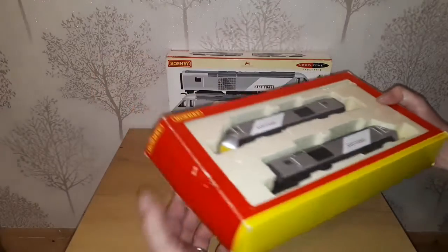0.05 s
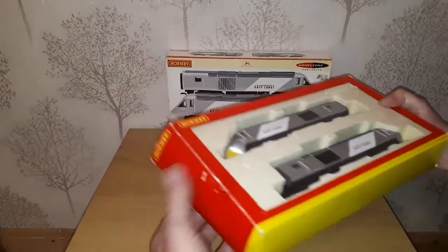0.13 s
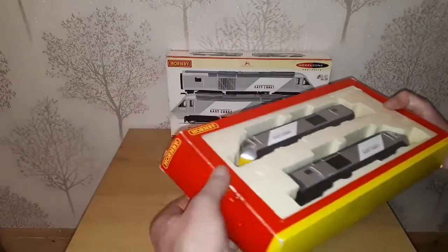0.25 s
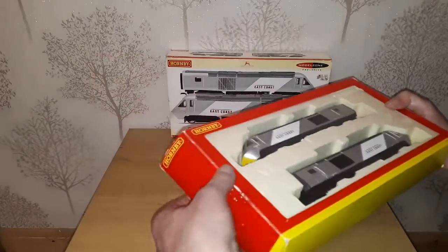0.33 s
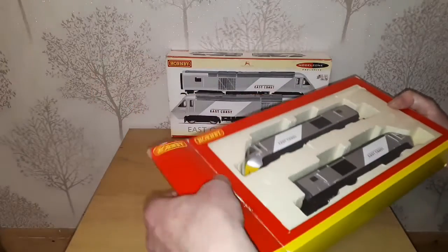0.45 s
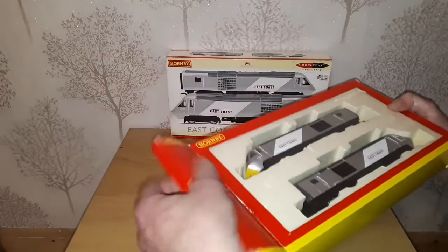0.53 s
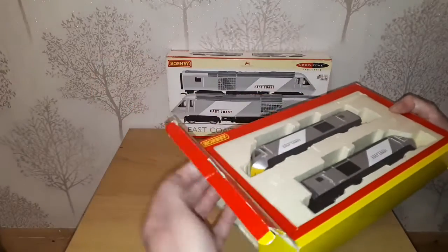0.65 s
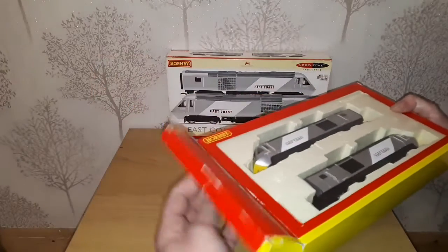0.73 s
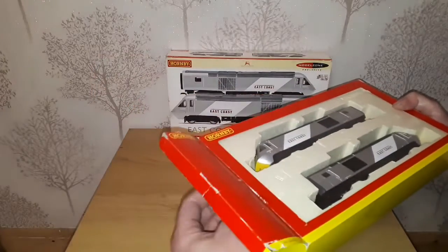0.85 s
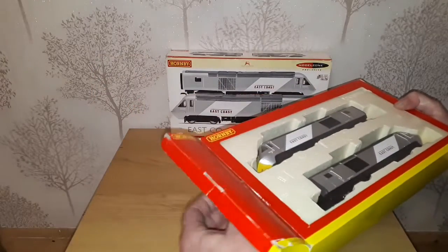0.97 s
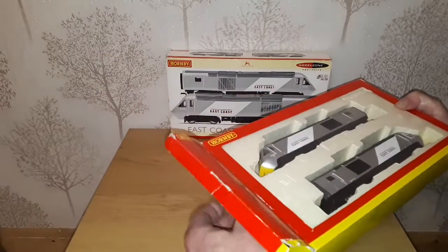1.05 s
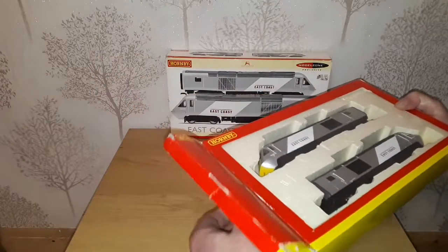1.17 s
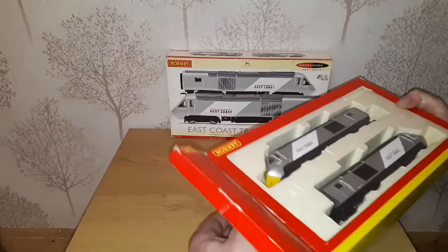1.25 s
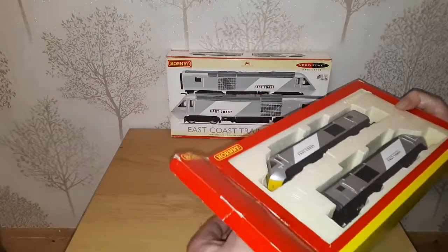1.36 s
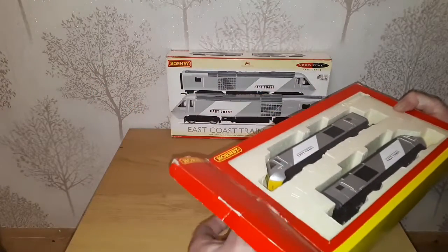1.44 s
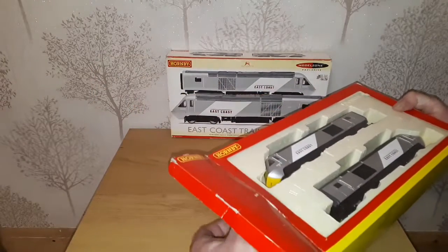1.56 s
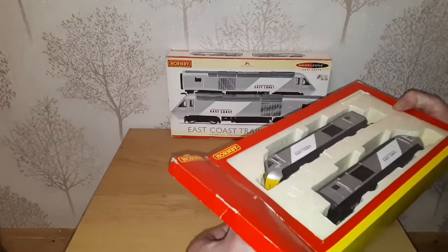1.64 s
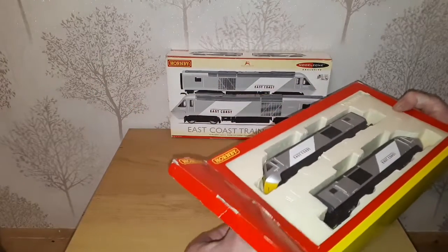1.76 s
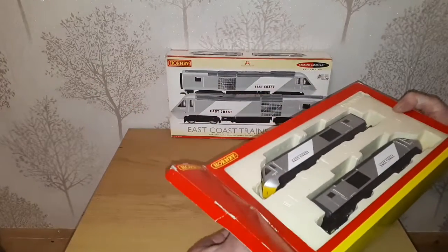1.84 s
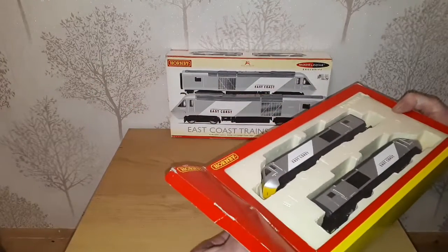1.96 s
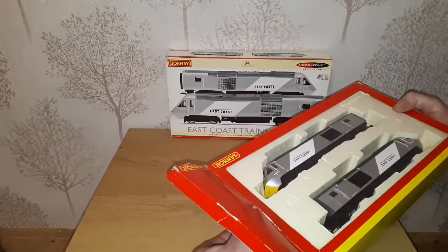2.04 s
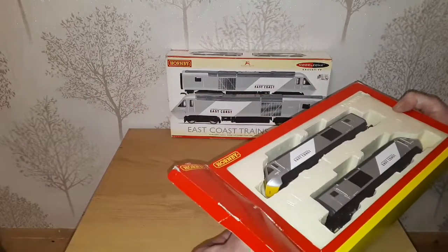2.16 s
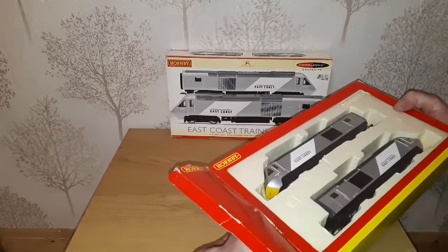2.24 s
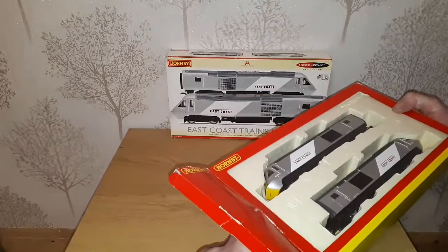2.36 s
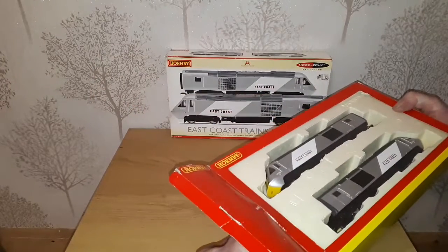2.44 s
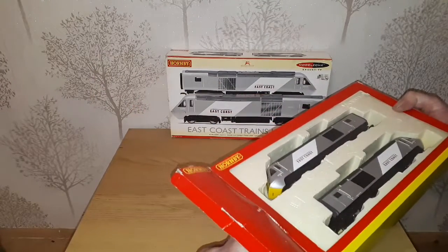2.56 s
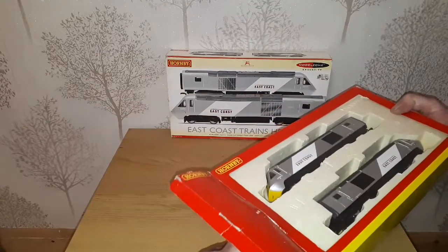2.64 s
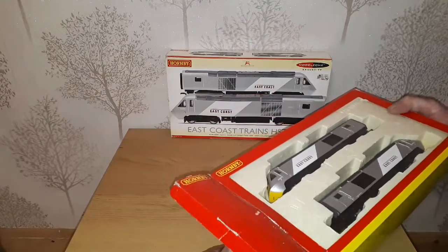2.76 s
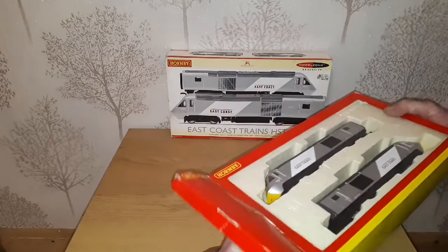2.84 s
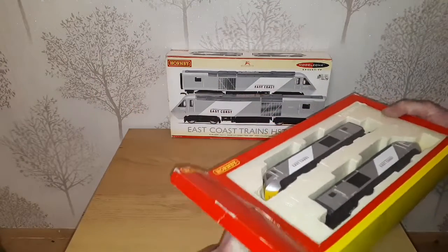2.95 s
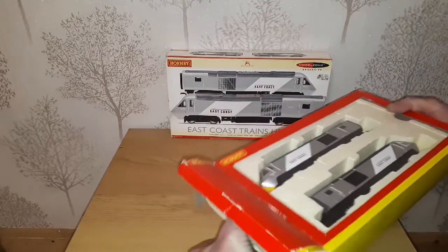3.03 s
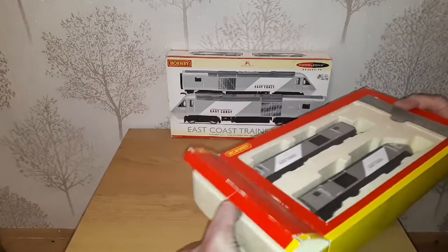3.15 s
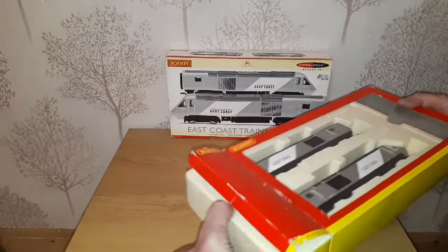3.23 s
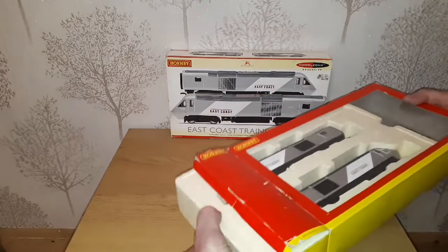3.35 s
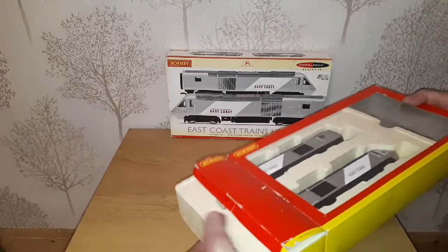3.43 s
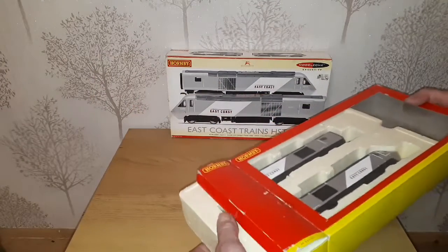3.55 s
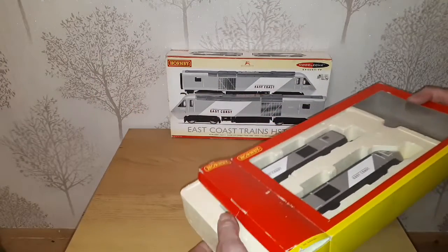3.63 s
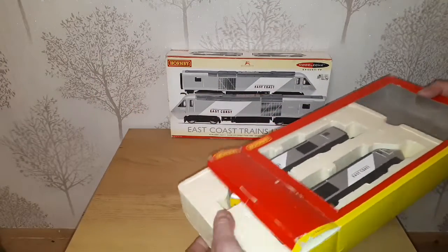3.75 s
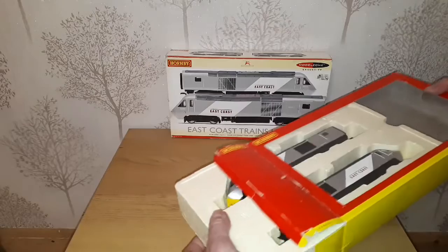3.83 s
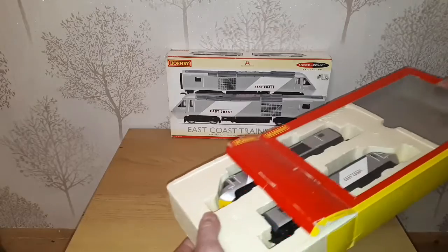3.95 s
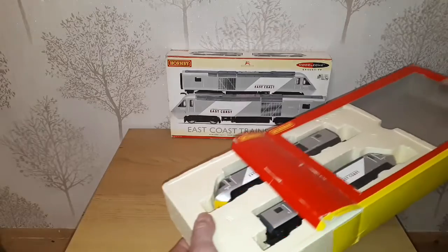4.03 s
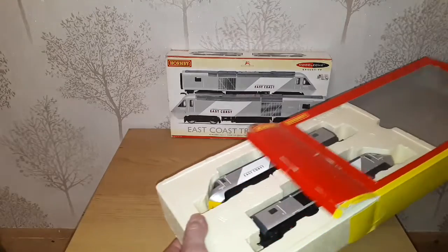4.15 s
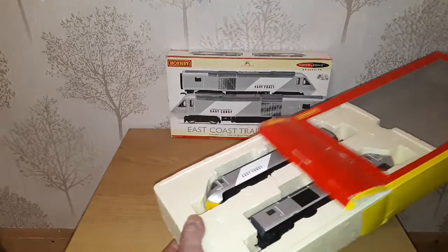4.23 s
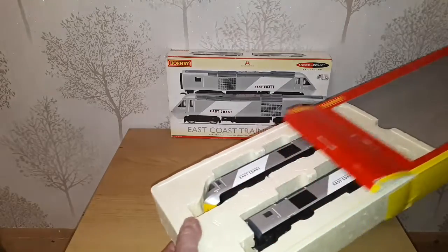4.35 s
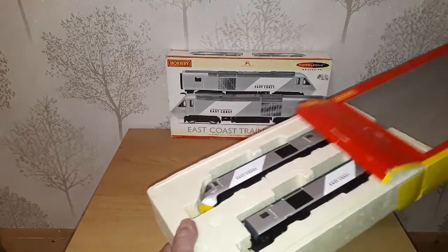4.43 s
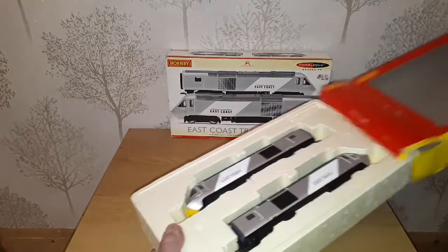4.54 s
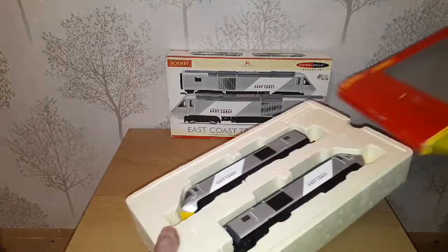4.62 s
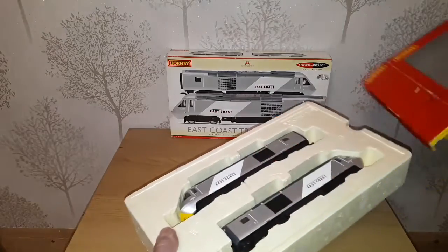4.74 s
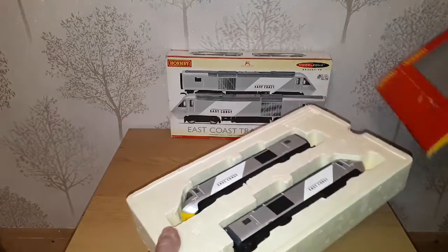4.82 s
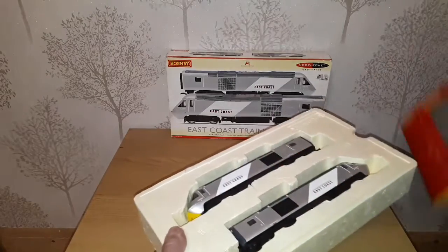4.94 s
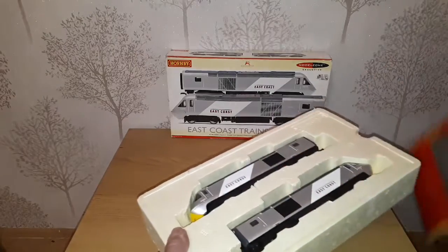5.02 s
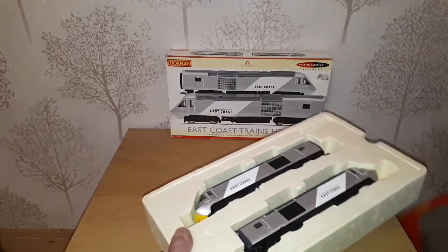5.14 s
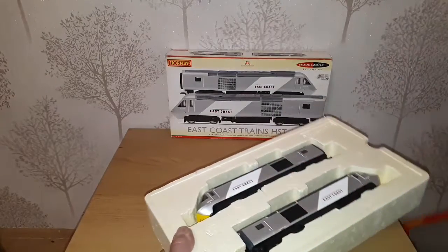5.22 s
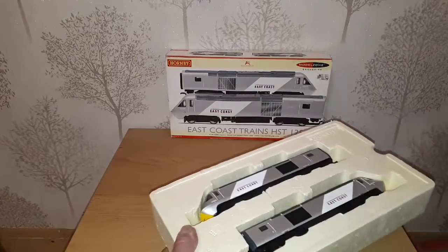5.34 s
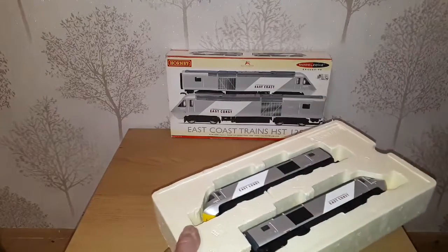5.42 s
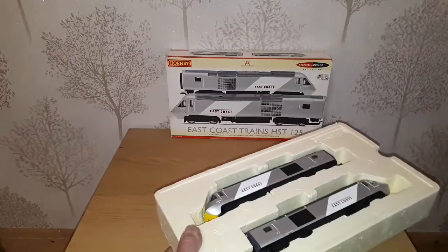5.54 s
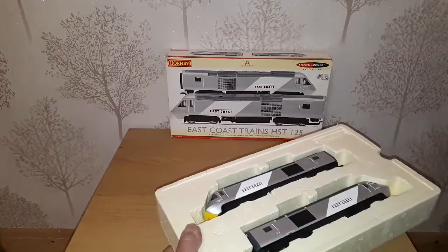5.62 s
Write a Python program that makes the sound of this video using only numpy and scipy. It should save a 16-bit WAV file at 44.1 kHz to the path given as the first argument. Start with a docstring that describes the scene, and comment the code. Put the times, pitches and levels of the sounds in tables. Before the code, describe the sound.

Fingers tap and rub a thin card box, then a foam tray hisses out in two strokes and the empty sleeve drops with a dull knock.

```python
"""In a quiet room, over a table, a thin card box is turned in two hands; fingers tap, grip and rub it.
A foam tray is pulled out in two strokes: the foam hisses on the card and the emptying sleeve hums hollow.
The sleeve slips free and is dropped aside with a dull knock.
Blows and friction noise excite the resonances of panels, sleeve, flap and edges; the room answers faintly."""
import sys
import numpy as np
from scipy import signal
from scipy.fft import rfft, irfft, next_fast_len
from scipy.io import wavfile
from scipy.ndimage import uniform_filter1d, map_coordinates

SR = 44100
rng = np.random.default_rng(int(sys.argv[2]) if len(sys.argv) > 2 else 0)


def int16_out(signal):
    """Quantize to a 16-bit WAV file."""
    q = np.round(np.clip(np.atleast_2d(signal).T, -1, 1) * 32767)
    wavfile.write(sys.argv[1], SR, q.astype(np.int16))


N = 250752  # samples

# resonances of the large panels, the sleeve, the flap and the card edges:
# (centre [Hz], width [Hz], relative level [dB])
PANEL_MODES = [(71, 14, -21.5), (97, 97, -6), (164.3, 43, 3.5), (231.6, 41, -2)]
SLEEVE_MODES = [(296.6, 65, -3.5), (393.4, 34, 0), (458, 78, -3.5), (577, 45.5, -1), (710, 108, -3.5),
                (873, 85, 0), (972, 135, -5.5)]
FLAP_MODES = [(1106, 150, 4.5), (1375, 185, 4.3), (1576, 243, 4.3), (1837, 110, 7.1), (2116, 310, 0.98)]
EDGE_MODES = [(2393, 340, -3.1), (2930, 500, -0.27), (3230, 520, 0.53), (3810, 580, -5)]
# smooth spectra of surface hiss and fine sizzle: (frequency [Hz], relative level [dB])
SURFACE_SPECTRUM = [(2410, -49), (4100, -8.5), (5910, -8.5), (7360, -15), (8000, -33.5), (10400, -46),
                    (17600, -120)]
SIZZLE_SPECTRUM = [(4710, -11), (8000, -9), (8660, -13), (10600, -8.5), (13800, -10.5), (15900, -14)]
# the sleeve laid to the right: (from time [s], delay of the left channel [s])
ASIDE_FROM, LEFT_DELAY = (5.2, .0003)
BOX_PAN_DB = -3.8  # left relative to right, for the body of the box


def amp(db):
    """Decibel law: amplitude gain of a level in dB."""
    return 10 ** (np.asarray(db) / 20)


def unit(x):
    """Power normalisation: scale a signal to rms 1."""
    return x / np.sqrt(np.mean(x ** 2) + 1e-20)


def along(points, hz):
    """Logarithmic frequency scale: interpolate (Hz, value) points along it."""
    f, v = np.transpose(points)
    return np.interp(np.log(hz + 1), np.log(f + 1), v)


def filtered(x, response):
    """Linear filtering: multiply the spectrum of x by a complex response of frequency."""
    m = next_fast_len(x.shape[-1] + 4096)  # padding keeps tails from wrapping round
    spectrum = rfft(x, m) * response(np.fft.rfftfreq(m, 1 / SR))
    return irfft(spectrum, m)[..., :x.shape[-1]]


def modes(table):
    """Modal superposition: causal response of damped resonators with alternating sign."""
    def response(f):
        total = 0
        for k, (centre, width, db) in enumerate(table):
            resonance = 1j * f * width / (centre * centre - f * f + 1j * f * width)
            total = total + (-1) ** k * amp(db) * resonance
        return total
    return response


def steep(table):
    """Modal magnitude raised to a power: resonances with dark skirts, for steady rubbing."""
    return lambda f: np.abs(modes(table)(f)) ** 1.5


def colour(table):
    """Spectral shaping: a smooth spectrum as a zero-phase response."""
    return lambda f: amp(along(table, f))


def wobble(rate):
    """Slow random modulation: a smooth curve through `rate` random knots a second."""
    knots = rng.standard_normal(int(N * rate / SR) + 4)
    return map_coordinates(knots, [np.arange(N) * rate / SR])


def narrow(hz, width_hz):
    """Quadrature modulation: low-passed noise carried to one resonance whose centre may move."""
    swing = filtered(rng.standard_normal((2, N)), lambda f: 1 / (1 + (2 * f / width_hz) ** 2))
    phase = 2 * np.pi * np.cumsum(hz * np.ones(N)) / SR
    return unit(swing[0] * np.cos(phase) + swing[1] * np.sin(phase))


def columns(rows):
    """Linear interpolation in time: a mask of the table's span and a curve for each later column."""
    s, *cols = np.transpose(rows)
    t = np.arange(N) / SR
    return (t >= s[0]) & (t <= s[-1]), [np.interp(t, s, c) for c in cols]


def sides(pan_db):
    """Interchannel level difference: left and right gains that differ by pan_db."""
    return amp([pan_db / 2, -pan_db / 2])


def wide(pair):
    """Interchannel coherence: mix two signals so that bass is shared and treble differs by side."""
    # likeness of left and right: (frequency [Hz], correlation [1])
    likeness = [(30, .8), (70, .93), (180, .97), (550, .78), (1650, .28), (5000, .05), (15000, .03)]

    def mid_side_gains(hz):
        angle = np.arccos(np.clip(along(likeness, hz), -1, 1)) / 2
        return np.array([np.cos(angle), np.sin(angle)])

    mid, side = filtered(pair, mid_side_gains)
    return np.array([mid + side, mid - side])


def room_tone():
    """Stationary background noise: random noise given the quiet room's spectrum."""
    # room tone: (frequency [Hz], relative level [dB])
    quiet_spectrum = [(13, -52), (22, -16.5), (59, -17), (97, -5.5), (222, -22), (292, -7), (364, -16.5),
                      (1800, -28.5), (1950, -25.5), (4460, -32), (13400, -36.5), (15800, -39.5)]
    noise = filtered(rng.standard_normal((2, N)), colour(quiet_spectrum))
    return amp(-70.5) * unit(wide(noise)) * sides(-4.5)[:, None]


def walls(x):
    """Reverberation: convolution with a noise tail whose decay time depends on frequency."""
    # decay of the room: (frequency [Hz], t60 [s])
    room_decay = [(150, 0.25), (1000, 0.26), (5000, 0.36), (12000, 0.039)]
    hz, t, z = signal.stft(rng.standard_normal((2, SR // 2)), SR, nperseg=256)
    decay = amp(-60 * t / along(room_decay, hz)[:, None])
    tail = wide(signal.istft(z * decay, SR, nperseg=256)[1])
    tail = tail / np.linalg.norm(tail[0])
    late = np.pad(x.mean(0), (250, 0))[None]  # 250 samples before the room answers
    return signal.fftconvolve(late, tail, axes=1)[:, :N]


def landing():
    """Impact-excited modes: the surface under the dropped sleeve rings low and dull at each bounce."""
    # the sleeve lands flat and bounces: (time [s], level [dB])
    bounces = [(5.585, -31), (5.604, -25.5), (5.627, -33.5), (5.649, -46)]
    # what it lands on: (frequency [Hz], relative level [dB], t60 [s])
    ground_modes = [(45, -34.5, 0.11), (76.6, -13, 0.21), (105, -15, 0.093), (164, -5, 0.16),
                    (204.6, -1.5, 0.17), (254, -15, 0.12)]
    out, t = np.zeros(N + SR), np.arange(SR // 4) / SR
    for s, db in bounces:
        ring = 0
        for hz, level, t60 in ground_modes:
            level = level + rng.normal(0, 1.57)  # each bounce favours the modes differently, dB
            ring = ring + amp(level - 60 * t / t60) * np.sin(2 * np.pi * hz * t)
        soft_onset = 1 - np.exp(-t / 0.0045)
        out[round(s * SR):][:len(t)] += amp(db) * ring * soft_onset
    left = np.roll(out, round(LEFT_DELAY * SR))
    return np.array([left, out])[:, :N] * sides(-0.77)[:, None]


def hollow():
    """Air-cavity resonance: the sleeve's note sinks and breaks up in the long pull; thin tones linger."""
    # strength of the air note: (time [s], level [dB])
    air_strength = [(3.76, -70), (3.828, -52), (4.082, -43), (4.17, -52.5), (4.26, -40), (4.284, -50),
                    (4.534, -36.5), (4.612, -36.5), (4.642, -25.5), (4.754, -52), (4.78, -60)]
    # thin wavering tones: (centre [Hz], width [Hz], level [dB], t60 [s])
    thin_tones = [(318, 46, -58.5, 2.8), (2830, 238, -59, 0.63), (5300, 500, -78, 3.1)]
    # their envelope, after the sleeve slips off: (start [s], swell [s], end [s], dying [s])
    start, swell, end, dying = (4.70, 0.022, 5.08, 0.039)
    air_hz, sag_hz_per_s = 578, 28
    t = np.arange(N) / SR
    on, (air_db,) = columns(air_strength)
    pitch = air_hz - sag_hz_per_s * (t - air_strength[0][0]) + 14 * wobble(18)
    note = on * amp(air_db + 2.24 * wobble(40)) * narrow(pitch, width_hz=57)
    shape = np.clip((t - start) / swell, 0, 1) * np.clip(1 - (t - end) / dying, 0, 1)
    thin = 0
    for hz, width, db, t60 in thin_tones:
        level = db - 60 * np.abs(t - start) / t60 + 1.6 * wobble(22)
        thin = thin + shape * amp(level) * narrow(hz, width)
    return (note + thin) * sides(BOX_PAN_DB)[:, None]


def crisp(f):
    """Broadband contact radiation: the summed spectrum of hiss, sizzle and edges in a tap's snap."""
    surface = amp(along(SURFACE_SPECTRUM, f))
    sizzle = amp(along(SIZZLE_SPECTRUM, f) - 17.5)
    return surface + sizzle + 0.43 * np.abs(modes(EDGE_MODES)(f))


def spot(table, hz, spread):
    """Position-dependent modal excitation: a blow favours modes near hz, within spread * hz."""
    return lambda f: modes(table)(f) * (0.11 + np.abs(modes([(hz, spread * hz, 0)])(f)) ** 2)


def taps():
    """Impulsive excitation: a blow and a short rough contact ring the modes near the spot hit."""
    # taps and catches: (time [s], sleeve peak before panning [dB], then over that peak: flap [dB],
    # surface snap [dB], panel thud [dB]; favoured sleeve mode [Hz], favoured flap mode [Hz])
    tap_list = [(0.089, -61.5, 16.5, 6, -16, 400, 1720), (0.243, -56.5, 6.5, -6, -4, 314, 1340),
                (0.283, -57.5, -4, 3.5, -13, 780, 1370), (0.309, -55.5, 6, 11, -1, 743, 1580),
                (0.4, -47.5, 16, 14, -9.5, 960, 1600), (0.408, -35, 7, 4, -27, 490, 1370),
                (0.643, -56, 9, -4, 4.5, 398, 1480), (0.668, -41.5, 0, -10, -13, 530, 1320),
                (0.717, -43, 4.5, -3.5, -2, 394, 1350), (0.759, -52, 11, -10, -4, 880, 1360),
                (0.84, -51, -3, 7, -7, 312, 1280), (0.859, -49, -12, 0, -6, 279, 1350),
                (0.909, -34, 7.5, -5.8, -6.5, 600, 1470), (0.917, -64, -9, -2, 3, 570, 1354),
                (0.973, -50, -18, -17, 5.5, 762, 1060), (1.08, -46, -2, 6.5, -30, 560, 1080),
                (1.14, -39, -5, -9, -24, 825, 1150), (1.156, -40, 0, -8.5, -25, 534, 1240),
                (1.189, -38, 0, -29, -31, 562, 1280), (1.503, -47, -13, -18, -14, 580, 1087),
                (1.598, -49, 1, 6, -1, 261, 1233), (1.632, -52, -4, -8, -6, 635, 1350),
                (1.667, -42, 0, -14, -19, 585, 1730), (1.783, -40.5, -15, -6, -14, 564, 1140),
                (1.798, -43.5, 7, -2, -7, 415, 1170), (1.858, -51, 6, 6, 1, 527, 1190),
                (1.924, -69, -8, 16.5, -15, 500, 1200), (2.128, -53, -4, -9, -11, 392, 1080),
                (2.202, -53.5, -5, -17, -3, 287, 1128), (2.273, -49.5, -2, -2, -18, 466, 1090),
                (2.305, -47.5, 3.5, -10.5, -22, 744, 1138), (2.39, -43.5, -7, -9, -31, 300, 1095),
                (2.409, -44, -14, -21, -33, 311, 1071), (2.484, -55.5, -2, -4, -12, 510, 1100),
                (2.837, -51, -4, -14, -12.5, 312, 1020), (2.866, -54, -12, -15, -6, 450, 1100),
                (2.923, -47.5, -32, -13, -20, 381, 1179), (2.945, -52, -21, -17, -6, 450, 1100),
                (3.334, -33, 3.5, -19, -28, 416, 1483), (3.362, -20.5, -5.5, -19, -21, 598, 1000),
                (3.389, -27.5, -5, -13, -25, 560.7, 1152), (3.688, -57, -10, -9, 13.5, 295, 1022),
                (4.07, -41.5, -15, -14, -37, 575, 1400), (4.24, -35, -9, -18.5, -37, 530, 1470),
                (4.339, -29, -12, -8.5, -28, 553, 1080), (4.387, -25, -25, -9, -44, 546, 1018),
                (4.476, -25.5, -5, -32, -34, 607, 1080), (4.54, -27, -26, -22, -15, 520, 1114),
                (4.575, -30.5, -30, -11, -38, 532, 1026), (4.636, -24.5, 0.5, -8.5, -23, 550, 1070),
                (4.64, -25.5, -28, -22, -24, 574, 1010), (4.654, -28, -35, -37, -27, 570, 1011),
                (4.673, -31.5, 4, 2.5, -33, 589, 2053), (4.733, -26.5, -9.5, -38.5, -18, 513, 1200),
                (4.82, -38, -24, -30, -34, 295, 1012), (5.287, -51.5, 0, -26, -27, 712, 1270),
                (5.337, -53, -21, -25, -3, 583, 1040), (5.443, -50, -2, -25, -7, 591, 1076),
                (5.51, -56, -4, -26, 1, 490, 1035), (5.537, -53, -5, -21, 0, 312, 1106),
                (5.583, -24.5, -3, -10, -38, 600.6, 2080), (5.591, -20, -12, -32, -28, 674, 1039),
                (5.605, -48, -16, -6, -19, 260, 1082)]
    contact_t60, panel_hz = .013, 143  # s; panel mode a tap favours, Hz
    out, t = np.zeros((2, N + SR)), np.arange(SR // 8) / SR
    shape = amp(-60 * t / contact_t60)
    for s, db, flap_db, snap_db, thud_db, sleeve_hz, flap_hz in tap_list:
        contact = shape * rng.standard_normal((2, len(t)))
        contact[0, 0] += 22  # the blow itself, in the part shared by both sides
        sleeve = filtered(contact, spot(SLEEVE_MODES, sleeve_hz, 0.42))
        flap = filtered(contact, spot(FLAP_MODES, flap_hz, 0.22))
        thud = filtered(contact, spot(PANEL_MODES, panel_hz, 0.32))
        # soft skin and card: the snap swells over a millisecond or two
        snap = shape * (1 - np.exp(-t / 0.0026)) * filtered(rng.standard_normal(contact.shape), crisp)
        body = 0
        for part, over_db in ((sleeve, 0), (flap, flap_db), (thud, thud_db), (snap, snap_db)):
            body = body + amp(db + over_db) * part / np.abs(part).max()
        left, right = wide(body) * sides(BOX_PAN_DB)[:, None]
        at = round(s * SR)
        late = round(LEFT_DELAY * SR) * (s > ASIDE_FROM)
        out[0, at + late:][:len(t)] += left
        out[1, at:][:len(t)] += right
    return out[:, :N]


def friction(response, slip_hz, slip_db, patch_db=2.0):
    """Stick-slip friction: stuttering contact noise excites a response."""
    force = amp(slip_db * wobble(slip_hz)) * rng.standard_normal((2, N))
    # fibres that let go add sparse ticks, about 250 a second
    force += 5 * (rng.random((2, N)) < 250 / SR) * rng.standard_normal((2, N))
    # random time-frequency patches vary the noise, smoothed over neighbouring bands and frames
    z = signal.stft(force, nperseg=512)[2]
    field = uniform_filter1d(rng.standard_normal(z.shape[1:]), size=3, axis=0)
    field = uniform_filter1d(field, size=14, axis=1)
    force = signal.istft(z * amp(patch_db * unit(field)), nperseg=512)[1][:, :N]
    return unit(wide(filtered(force, response)))


def fingers():
    """Power addition of sources: each finger rub swells to its peak and dies, in six layers."""
    # finger rubs: (peak time [s], rise [s], fall [s], surface hiss [dB], then over the hiss:
    # fine sizzle [dB], edge scrape [dB], flap rattle [dB], sleeve hum [dB], panel flex [dB])
    rub_list = [(.03, 0.053, 0.12, -66.5, -15, -1.5, 1.5, -7, -15),
                (.095, 0.021, 0.19, -71.5, -17, -3, 6, 3, -13),
                (0.312, 0.067, 0.36, -67.5, -15, 2, 7.5, 7, -14),
                (0.412, 0.02, 0.032, -42.5, -16, -6, 2, 2, -1),
                (0.449, 0.082, 0.16, -64, -5.5, 2.5, 7, 11, -8),
                (0.661, 0.029, 0.088, -59.5, -11, 2.5, 6, 7, 10),
                (.74, 0.057, 0.39, -62.5, -9, 1, 2, 4, -8), (0.872, 0.04, 0.11, -56, -6.5, 12, 8, 2.5, -17),
                (.915, 0.011, 0.2, -56.5, -7, 2, 0, 10.5, 4),
                (1.078, 0.0075, .08, -58, 1.5, -12, -19, 4, -7),
                (1.17, 0.086, 0.12, -64.5, -8, -2, 2, 8, -3),
                (1.281, 0.14, 0.13, -59.5, -11, 3, 2, 2.5, -24),
                (1.36, 0.15, 0.046, -61, -13, -7, -12, -3.5, -10.5),
                (1.46, 0.15, 0.15, -71.5, -12, -2, -2, 6.5, -0.5),
                (1.552, 0.075, 0.13, -55.5, -7, -1.5, -7.5, -3.5, -17),
                (1.653, 0.045, 0.18, -57, -9, -2, -1.5, 5, -16),
                (1.8, 0.028, 0.094, -55, -10, -1, 2.5, 8.5, -11),
                (1.854, 0.043, .09, -59.5, -3, -3, 0, 2.5, 2),
                (1.979, 0.041, 0.034, -64.5, -10, -20, -22, -4, -6),
                (2.125, 0.044, 0.12, -65.5, -6.5, -12, -7.5, 6, 2),
                (2.311, 0.065, 0.15, -61.5, -15, -5, -6, 11, -12),
                (2.414, 0.067, 0.066, -53.5, -5, -11.5, -10, 2, -23),
                (2.651, 0.087, 0.16, -58, -12, -3.5, -2.5, -5, -18),
                (2.76, 0.084, 0.061, -61.5, -12, 1, 0, 5, -7), (2.861, 0.037, .06, -72, -5, -1, 4.5, 9, 0),
                (2.95, 0.12, 0.17, -69, -11, -0.5, 1, 8.5, -0.5),
                (3.525, 0.058, 0.16, -53.5, -3, -25, -12, -6.5, -20),
                (3.689, 0.011, 0.056, -55, -1.5, -19, -6, -1.5, -9),
                (4.96, 0.26, 0.24, -75, -16, -6, -6, 11, 13.5),
                (5.29, 0.0045, 0.28, -95, 0, 0, 22.5, 31, 29),
                (5.542, 0.14, 0.15, -77, -12, 2, 9.5, 17.5, 14),
                (5.596, 0.024, 0.11, -55, -4.5, 5, 11.5, 21.5, 18)]
    rise_curve, fall_curve = 1.18, 1.61  # exponents of the swell and the decay
    t, power = np.arange(N) / SR, np.zeros((6, N))
    for s, rise, fall, db, *over_db in rub_list:
        swelling = np.clip(1 + (t - s) / rise, 0, 1) ** rise_curve
        dying = np.clip(1 - (t - s) / fall, 0, 1) ** fall_curve
        shape = np.where(t < s, swelling, dying)
        levels = amp(db + np.array([0, *over_db]))[:, None]
        power += (levels * shape) ** 2
    return power


def tray():
    """Power addition of sources: the sliding foam drives the same six layers in each stroke."""
    # one table a stroke: (time [s], foam hiss [dB], fine sizzle over the hiss [dB],
    # flap rattle over the hiss [dB], sleeve hum [dB], panel flex [dB])
    strokes = [
        [(2.98, -73.5, -18, 6, -59, -78), (3.048, -49, -10, 0, -55.5, -82), (3.118, -43, -4.5, -5, -48, -51.5),
         (3.208, -51.5, -1.5, 0.5, -53.5, -74), (3.272, -44.5, -6, -7, -54.5, -72),
         (3.346, -42, -3, -1.5, -40.5, -53.5), (3.388, -42.5, -3, -2, -38.5, -50.5),
         (3.476, -59.5, -5, 2.5, -58, -67), (3.512, -57.5, 2, -3, -65, -70), (3.588, -72, -2, 0, -71, -62),
         (3.618, -71, -1, -4, -82, -88), (3.666, -61, -3, -9, -87, -78), (3.68, -73, -2, -7, -69, -61)],
        [(3.72, -71, 1, 3, -62.5, -61), (3.774, -53, -5, -7, -66, -85), (3.8, -47.5, -3.5, -3, -57.5, -71),
         (3.958, -43.5, -4, -2.5, -49, -56), (4.146, -45.5, -0.5, -1.5, -43.5, -67),
         (4.164, -44, -2, -3, -48.5, -66), (4.304, -43.5, -1.5, -4, -44, -57),
         (4.324, -43.5, -0.5, -1.5, -43.5, -50), (4.452, -40, -2, -5.5, -43.5, -58),
         (4.568, -45, 2, -2, -40.5, -52), (4.672, -49.5, 3, 5, -39.5, -52), (4.762, -68.5, -3.5, 8, -48, -58),
         (4.88, -79.5, -14, 6.5, -64, -68)],
    ]
    power = np.zeros((6, N))
    for stroke in strokes:
        on, (hiss_db, fine_db, flap_db, hum_db, flex_db) = columns(stroke)
        edge_db = hiss_db - 4
        levels = [hiss_db, hiss_db + fine_db, edge_db, hiss_db + flap_db, hum_db, flex_db]
        power += on * amp(levels) ** 2
    return power


def rubbing():
    """Friction-driven resonance: sliding drives surface, edges, flap, sleeve and panels; grip favours modes."""
    # modes that the hold favours: (time [s], flap mode [Hz], how far it stands out [0-1], sleeve mode [Hz])
    grip = [(0, 1700, 0.4, 452.4), (.13, 1750, 0.3, 450), (.22, 1350, .8, 454), (.42, 1500, 0.52, 622.6),
            (.62, 1417, 0.82, 480), (.95, 1339, 0.93, 540.2), (1.15, 1170, 0.4, 646),
            (1.3, 1350, 0.77, 517), (2.1, 1150, .5, 480.7), (2.7, 1200, 0.66, 649), (3.2, 1450, 0.24, 629),
            (3.9, 1550, 0.21, 449.5), (4.5, 997, 0.63, 860.5), (4.75, 1250, 0.1, 530.8),
            (4.9, 1200, .3, 337.6), (5.25, 1100, .4, 450), (5.55, 1100, 0.44, 552), (5.69, 1200, 0.25, 593)]
    hiss, fine, edge, flap, hum, flex = np.sqrt(fingers() + tray())
    flap_hz, share, hum_hz = columns(grip)[1]
    share = np.clip(share, 0, 1)
    hiss = hiss * friction(colour(SURFACE_SPECTRUM), slip_hz=90.0, slip_db=1.0)
    fine = fine * friction(colour(SIZZLE_SPECTRUM), slip_hz=118.5, slip_db=-1.2)
    edge = edge * friction(steep(EDGE_MODES), slip_hz=78.9, slip_db=1.0)
    all_flap = friction(steep(FLAP_MODES), slip_hz=69.96, slip_db=3.5)
    flap = flap * (np.sqrt(1 - share ** 2) * all_flap + share * narrow(flap_hz, width_hz=250))
    all_sleeve = friction(steep(SLEEVE_MODES), slip_hz=44.05, slip_db=0.0)
    hum = hum * (0.8 * all_sleeve + 0.4 * narrow(hum_hz, width_hz=420))
    flex = flex * friction(steep(PANEL_MODES), slip_hz=26.14, slip_db=4.5)
    # the body of the box sits right of centre; hiss and bass arrive more evenly
    even = (hiss + fine + edge + flex) * sides(-1.16)[:, None]
    return even + (flap + hum) * sides(BOX_PAN_DB)[:, None]


def low_cut(f):
    """Low cut: a second-order high-pass thins the knocks and rubs below 45.3 Hz."""
    return (1j * f / (45.3 + 1j * f)) ** 2


def scene():
    """Superposition: box in the hands, room answer and room tone add."""
    sources = np.array([taps() + landing(), rubbing() + hollow()])
    knocks, rubs = filtered(sources, low_cut)
    answer = walls(amp(-8) * knocks + amp(-13.0) * rubs)
    return knocks + rubs + answer + room_tone()


def record(dry):
    """Band limitation: an ideal low-pass keeps nothing from 15830 Hz up."""
    return filtered(dry, lambda hz: hz < 15830)


dry = scene()
out = record(dry)
int16_out(out)
```